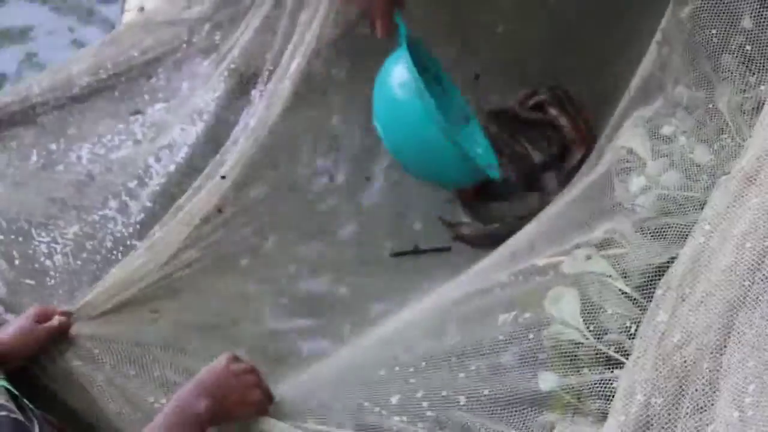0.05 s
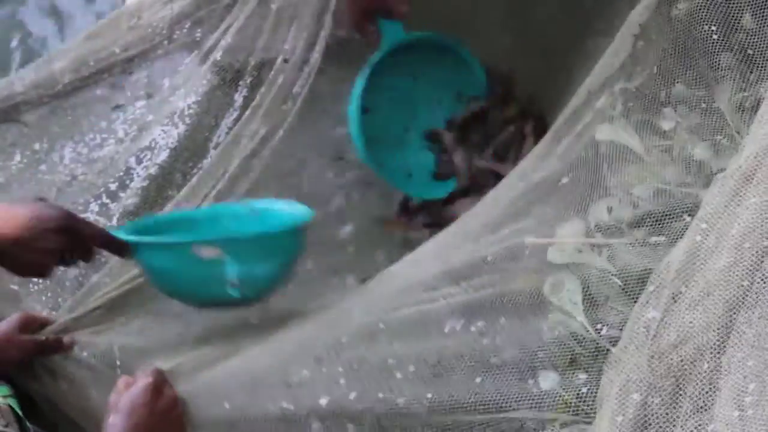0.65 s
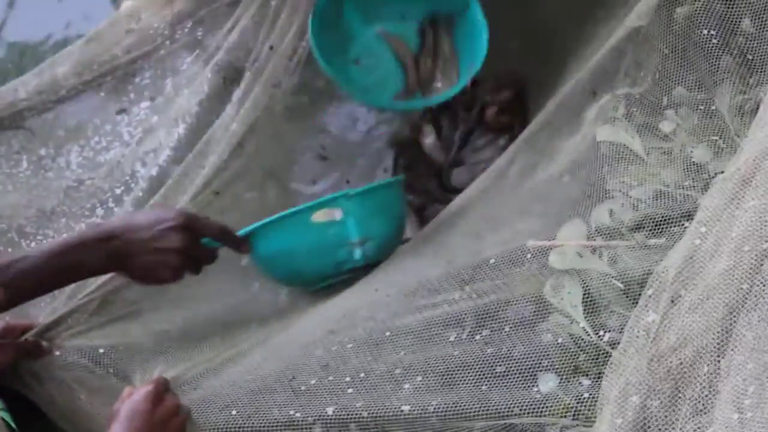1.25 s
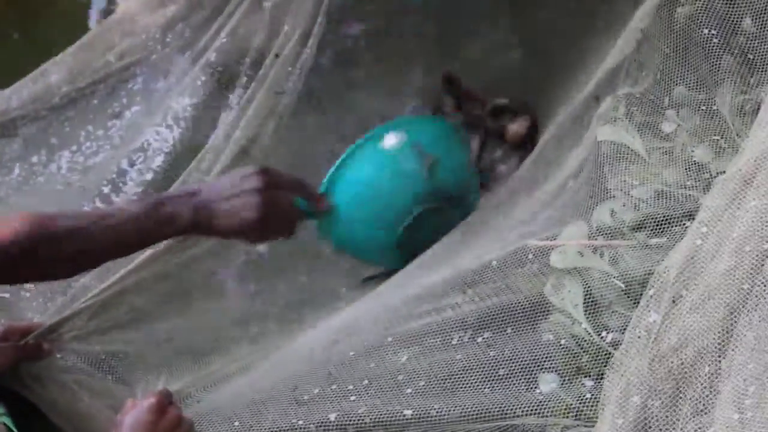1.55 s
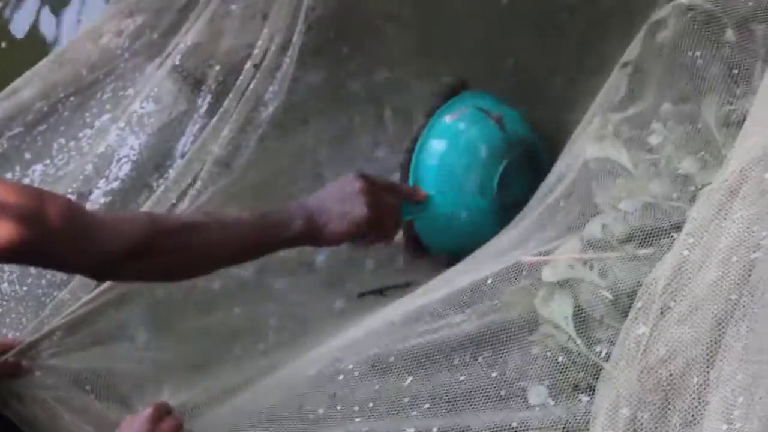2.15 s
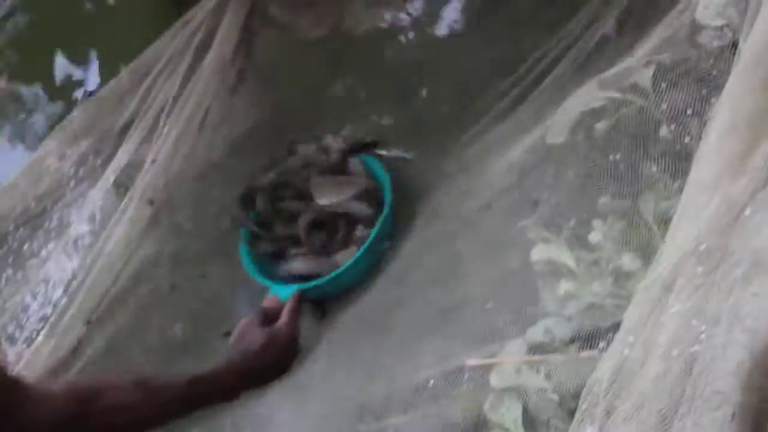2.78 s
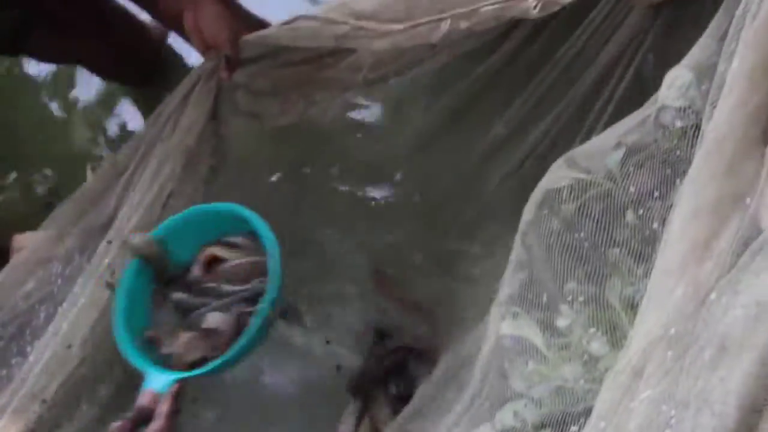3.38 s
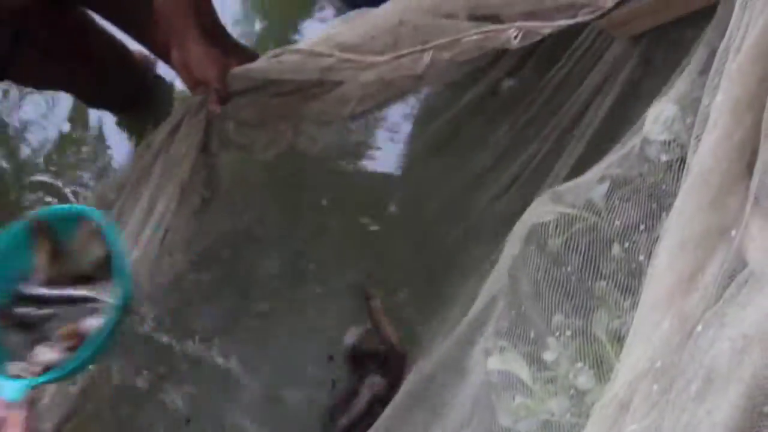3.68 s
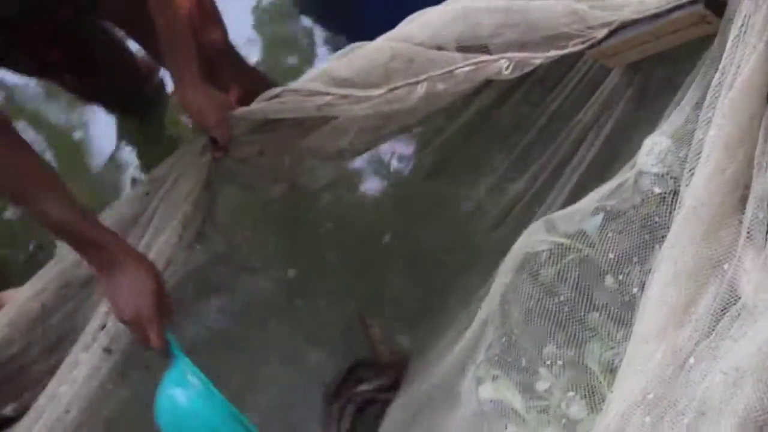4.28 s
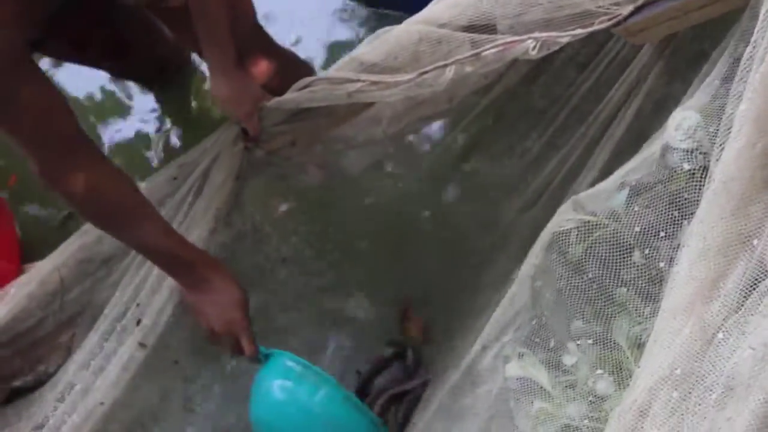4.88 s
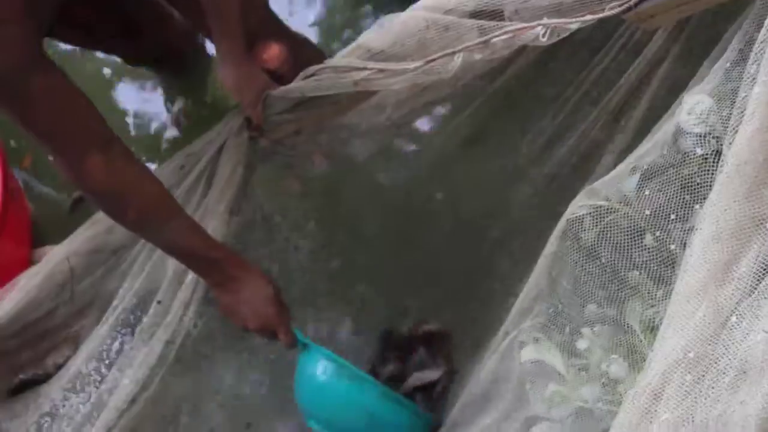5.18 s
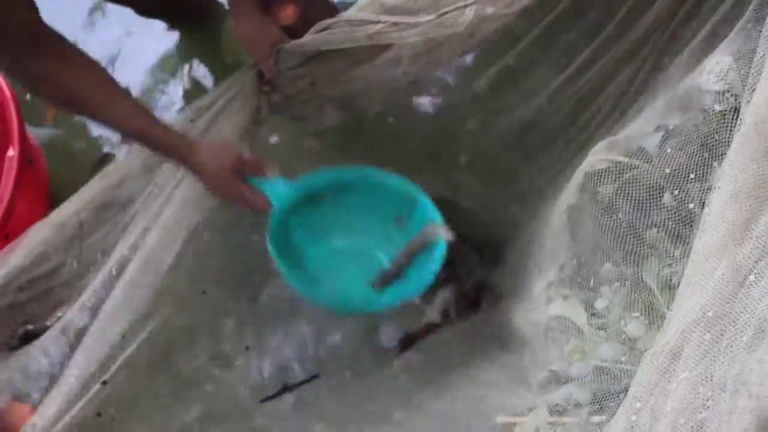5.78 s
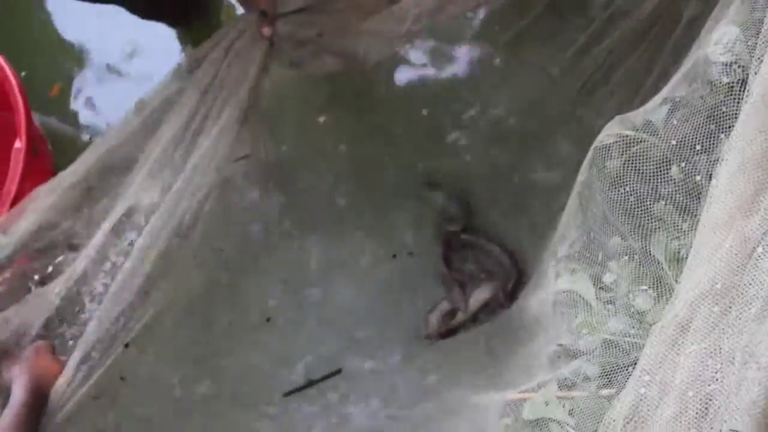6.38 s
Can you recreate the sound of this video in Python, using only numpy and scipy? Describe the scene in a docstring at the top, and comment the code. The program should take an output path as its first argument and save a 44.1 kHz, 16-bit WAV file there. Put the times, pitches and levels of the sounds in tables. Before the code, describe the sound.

At the start, water dumped from a plastic scoop splashes into a pond close to the microphone, thinning into fizzing bubbles and sharp drops by about 1.3 seconds, when a small bird whistles once, faintly. From there to about 4.5 seconds the scoop stirs softly through the water, with small sloshes and scattered ringing drips, busiest around 3 and 4 seconds. A quick cluster of light plastic knocks comes at 2.6 seconds, and a few more between 4.6 and 5.1. One bubble's ring lingers at 4.3. A distant bird gives one long, faint call from about 4.9 to 6.2 seconds. At 5.2 a second, deeper scoopful lands with a plop and a hollow note, then trickles away. After 6 seconds, three thin high whistles sound over a very faint far tone, with knocks at 6.2 and a duller, thudding one at 6.6. Quiet outdoor air hisses throughout.

```python
"""Small fish are scooped out of a net in a pond, close to one microphone outdoors.
First, water dumped from a plastic scoop splashes and fizzes away as countless bubbles ring.
A small bird whistles once; the scoop stirs, drips and takes light knocks, and one bubble's ring lingers.
Then a larger bird calls far off and a second, deeper scoopful falls.
A faint far tone, three thin whistles and a few last knocks end the scene."""
import sys
import numpy as np
from scipy import signal
from scipy.fft import rfft, irfft, next_fast_len
from scipy.io import wavfile
from scipy.ndimage import map_coordinates

SR = 44100
rng = np.random.default_rng(int(sys.argv[2]) if len(sys.argv) > 2 else 0)


def file_out(sig):
    """Save sig as 16-bit WAV at sys.argv[1]."""
    # one column per channel
    cols = np.atleast_2d(sig).T
    # limit, then scale
    lim = np.clip(cols, -1, 1)
    pcm = np.round(lim * 32767).astype(np.int16)
    wavfile.write(sys.argv[1], SR, pcm)


N = 293176
TOP_HZ = 15950  # the highest pitch the microphone keeps


def water():
    """Two scoopfuls fall into the pond and thin to a fizz; between them the scoop stirs."""
    # scoopfuls: start_s, length_s, gulps_db, bubbles_db, fizz_db, spray_db, afterflow_db, fade_db_per_s
    first, second = [(-.17, 1.56, -38, -36.5, -36.5, -38, 8.5, 15.5),
                     (5.199, .95, -39, -40, -41.5, -40.5, -10, 5.5)]
    # tone colours of the first pour, the stirring and the second pour: pitch_hz, level_db
    bright_colour = [(71, -45), (120, -27), (321, -12.5), (348, -18), (393, -13), (493, -9.5), (630, -4.5),
                     (698, -6.5), (949, 0), (1140, -1), (3380, -4.5), (6240, -9.5), (14700, -18),
                     (16000, -10)]
    stir_colour = [(150, -4), (450, -9), (800, 2), (1600, 3.5), (3200, 2), (5500, -4.5), (8500, -7.5),
                   (15000, -20)]
    deep_colour = [(71, -69), (120, -56), (217, -19.5), (393, -11), (436, -5.5), (670, -8), (856, -3.5),
                   (1070, -7.5), (1340, -4.5), (2340, -9.5), (4140, -12), (4780, -19.5), (14700, -36),
                   (16000, -36)]
    out = np.zeros(N)
    add(out, first[0], flow(pour_levels(first), bright_colour, density=1.5, thinning=1.8,
                            spray_cycles=11, spray_scatter_db=6.5, foam=0.94, clump_db=1.87))
    add(out, 0, flow(stroke_levels(), stir_colour, density=.4, thinning=1,
                     spray_cycles=88, spray_scatter_db=5.5, foam=1.0, clump_db=2))
    add(out, second[0], flow(pour_levels(second), deep_colour, density=3.5, thinning=1.4,
                             spray_cycles=5.5, spray_scatter_db=3.5, foam=0.9, clump_db=2))
    return out


def flow(levels_db, colour, density, thinning, spray_cycles, spray_scatter_db, foam, clump_db):
    """Four sizes of bubbles arrive in clumps over a hiss of foam; each size has its own level curve."""
    # ranges of gulps, bubbles, fizz and spray: low_hz, high_hz
    bands = [(150, 650), (650, 1900), (1900, 4500), (4500, 16000)]
    count = len(levels_db[0])
    gulps = cloud(count, 154, 770, 330 * density, cycles=14, scatter_db=1.5, thinning=thinning)
    bubbles = cloud(count, 646, 2240, 700 * density, cycles=27.7, scatter_db=3, thinning=thinning)
    fizz = cloud(count, 1930, 4870, 1000 * density, cycles=36, scatter_db=3.5, thinning=thinning)
    spray = cloud(count, 4330, 16900, 800 * density, spray_cycles, spray_scatter_db, thinning)
    clumps, out = wobble(54.99, count), np.zeros(count)
    for grains, band, db in zip((gulps, bubbles, fizz, spray), bands, levels_db):
        texture = colour_band(grains + foam * rng.standard_normal(count), band, colour)
        out += amp(db) * unit(texture * amp(clump_db * (clumps + wobble(90, count))))
    return out


def pour_levels(pour):
    """Levels in dB: each bubble size plunges in, then flows on more weakly until the scoop is empty."""
    # gulps to spray, larger ones build up longer: build_s, rise_db, fall_db_per_s, afterflow_db
    sizes = [(0.19, 6, 158, -24), (0.12, 2, 42, -16.5), (0.02, 2.5, 32, -12), (0.0056, -5, 39, -16)]
    drained_db_per_s = 78  # how fast the last water breaks off
    _, length, *peaks_db, after_db, fade = pour
    t, levels = clock(int((length + .2) * SR)), []
    for peak_db, (build, rise_db, fall, size_db) in zip(peaks_db, sizes):
        plunge = np.where(t < build, -rise_db * (1 - t / build), -fall * (t - build))
        afterflow = size_db + after_db - fade * t - drained_db_per_s * np.maximum(t - length, 0)
        levels.append(peak_db + 20 * np.log10(np.hypot(amp(plunge), amp(afterflow))))
    return levels


def stroke_levels():
    """Levels in dB: each stroke of the scoop swells and ebbs; deep ones trap larger bubbles."""
    # pushes through the water: middle_s, length_s, level_db, depth_db
    strokes = [(0.495, 0.057, -55.5, 4.9), (0.764, 0.032, -60, 4.5), (1.193, 0.069, -60.5, .4),
               (1.341, 0.036, -58, 4.5), (2.138, .24, -62, 6.5), (2.523, 0.44, -61, .5),
               (2.77, 0.23, -60.5, -0.2), (3.143, 0.21, -59, 0.5), (3.57, 0.8, -60.5, -0.6),
               (3.93, 0.33, -67, -3)]
    # bubble sizes from gulps to spray: level_db, share_of_depth
    sizes = [(-8, 1.62), (-0.85, 0.28), (1.1, -.5), (-5, -1.8)]
    edge_db = 5  # a stroke is this much weaker at its ends
    t = clock(int((strokes[-1][0] + 2 * strokes[-1][1]) * SR))
    power = np.zeros((len(sizes), len(t)))
    for middle, length, db, depth_db in strokes:
        swell_db = db - edge_db * (2 * (t - middle) / length) ** 2
        power += [amp(swell_db + size_db + share * depth_db) ** 2 for size_db, share in sizes]
    return 10 * np.log10(power + 1e-20)


def slaps():
    """A drop hits the surface with a sharp tick inside a brief swell of fine spray."""
    # drops landing: time_s, level_db, pitch_hz
    drops = [(.042, -20.5, 3160), (0.0973, -39, 3600), (.11, -25.5, 4500), (0.258, -26, 3580),
             (0.354, -28, 5960), (.397, -27, 5063), (.527, -32, 3030), (0.599, -30.5, 4560),
             (0.8272, -28, 6550), (0.8808, -37, 3200), (.973, -33.5, 3640), (1.111, -34, 4040),
             (2.3246, -28, 4250), (2.7139, -30.5, 3800), (2.735, -30, 3220), (3.085, -29, 3560),
             (3.194, -30.5, 3370), (3.724, -35, 3370), (3.863, -40, 4300), (3.9225, -30.5, 2980),
             (4.037, -35.5, 3400), (4.135, -41.5, 3900), (4.444, -37, 5100), (4.568, -31, 3220),
             (4.9854, -35, 6500), (5.115, -39.5, 5760), (5.184, -33, 4200), (5.214, -23, 5000),
             (5.764, -38.5, 2970)]
    out, t = np.zeros(N), clock(SR // 16) - .006
    for time, db, hz in drops:
        tick = bubble(np.maximum(t, 0), hz, 6 / hz, rise=0.24, swell=0.63)
        spray = band_noise(len(t), hz * .5, hz * 2.37)
        mist = amp(-22 - 60 * np.maximum(t / 0.087, -t / 0.009))
        burst = amp(-10.5 - 60 * np.maximum(t / 0.0098, -t / 0.0032))
        add(out, time + t[0], amp(db - 1) * (amp(-1) * unit_peak(tick) + spray * (mist + burst)))
    return out


def drips(moving_water):
    """Each drip traps one bubble; large ones in calm water ring longest and splatter least."""
    # the loudest single bubbles: start_s, level_db, pitch_hz
    loud_bubbles = [(.074, -34, 3230), (0.174, -32.5, 2460), (.21, -34.5, 1430), (.481, -39.5, 1660),
                    (.528, -35, 2040), (.723, -41, 2900), (.759, -43, 1630), (0.761, -51, 445),
                    (0.788, -42, 2920), (0.879, -37.5, 2750), (1.0125, -32, 1964), (1.188, -44, 1616),
                    (1.235, -46, 3120), (1.278, -46.5, 3700), (1.402, -49, 2320), (1.746, -51, 1430),
                    (1.841, -52, 816), (1.935, -54, 1570), (1.9819, -43, 2310), (2.0094, -41.5, 2110),
                    (2.2, -45.5, 3470), (2.33, -37, 1565), (2.412, -45.5, 2830), (2.718, -38.5, 1670),
                    (2.761, -40, 1460), (2.763, -41, 929), (2.789, -37, 1495), (2.788, -43, 316),
                    (2.862, -40.5, 1676), (2.958, -45, 1830), (3.082, -43, 2650), (3.122, -43, 2390),
                    (3.166, -39, 1344), (3.1804, -30, 952), (3.1937, -36.5, 2050), (3.212, -41, 1554),
                    (3.481, -48.5, 860), (3.555, -48.5, 521), (3.628, -43.5, 1376), (3.729, -50, 780),
                    (3.806, -43.5, 1230), (3.888, -42.5, 3710), (3.89, -48.5, 716), (3.896, -45, 2980),
                    (3.923, -43.5, 2410), (3.934, -41.5, 3000), (3.976, -47.5, 1840), (4.002, -43.5, 3120),
                    (4.041, -43.5, 1250), (4.091, -46, 1710), (4.244, -50, 1100), (4.29, -39, 1280),
                    (4.427, -43.5, 1462), (4.569, -44, 3520), (4.902, -51, 298), (5.367, -35, 450),
                    (5.754, -48.5, 1290), (5.81, -44, 472), (5.921, -44.5, 2410)]
    # churned water cuts the ring short: water_level_db, ring_time_factor
    damping = [(-72, 1.7), (-58, 1)]
    out, t = np.zeros(N), clock(SR // 8)
    for start, db, hz in loud_bubbles + stray_drips():
        water_now = moving_water[round(start * SR):][:SR // 30]
        water_db = 10 * np.log10(np.mean(water_now ** 2) + 1e-20)
        ring_s = 0.042 * (1000 / hz) ** 0.5 * np.interp(water_db, *np.transpose(damping))
        ring = bubble(t, hz, ring_s, rise=0.091, swell=1.4)
        splatter = band_noise(len(t), hz * .5, hz * 2.4)
        splatter *= amp(-6 - 60 * t / 0.057) * (1 - np.exp(-t / 0.0019))
        add(out, start, amp(db) * (unit_peak(ring) + splatter / (1 + ring_s / 0.1)))
    return out


def stray_drips(first_s=1.3, last_s=4.3, per_s=4):
    """Faint drips fall off the net and hands at random: start_s, level_db, pitch_hz."""
    span = last_s - first_s
    draws = rng.uniform(-0.92, 1, (int(per_s * span), 3))
    return [(first_s + span * abs(when), -55 + 10 * size, 1910 * 2 ** (0.69 * pitch))
            for when, size, pitch in draws]


def sloshes(count=36):
    """A short rush of small bubbles drifts in pitch as the sheet of water thickens or thins."""
    # spills off the rim: start_s, length_s, level_db, first_hz, last_hz
    spills = [(0.165, 0.055, -45, 3480, 1860), (1.313, .046, -55, 800, 1300),
              (1.929, 0.028, -51.5, 1700, 2760), (2.035, .045, -52.5, 595, 514),
              (2.083, 0.04, -49.5, 456, 640), (2.163, .052, -55, 550, 1500),
              (2.191, 0.023, -50, 3140, 3560), (3.074, 0.034, -43, 5270, 1020),
              (3.121, 0.02, -43.5, 2960, 1300), (3.19, 0.03, -44, 1360, 2430),
              (3.625, 0.034, -49.5, 2000, 1100), (3.716, 0.021, -49, 3260, 990),
              (3.858, 0.019, -47.5, 5800, 4730), (3.883, 0.011, -48.5, 4300, 3300),
              (3.92, 0.039, -47.5, 3740, 1720), (4.426, 0.02, -51.5, 2400, 1524),
              (5.18, .02, -47, 2600, 4500)]
    out, t = np.zeros(N), clock(SR // 14)
    for start, length, db, first_hz, last_hz in spills:
        when, size = rng.random((2, count, 1))
        hz = first_hz * (last_hz / first_hz) ** when * np.exp(0.324 * rng.standard_normal(when.shape))
        rings = bubble(np.maximum(t - when * length, 0), hz, 15 / hz, rise=0.69, swell=1.1)
        rush = np.sum(amp(-9 * size) * rings, axis=0)
        strength = np.sqrt(np.sum(rush ** 2) / (length * SR))
        add(out, start, amp(db - 4.5) * rush / strength)
    return out


def knocks():
    """The wet plastic scoop rings briefly when knocked; some knocks are dull, others bright."""
    # knocks on the scoop: start_s, peak_db, brightness_hz
    hits = [(2.57, -35.5, 800), (2.581, -37.5, 1040), (2.591, -31.5, 1315), (4.577, -37, 1860),
            (4.684, -39.5, 1250), (4.911, -36.5, 4100), (4.921, -42, 2960), (5.051, -35, 2920),
            (6.161, -34, 1520), (6.175, -34, 3120), (6.607, -32, 760), (6.612, -29.5, 730),
            (6.626, -35.5, 497)]
    # notes of the scoop and the hand holding it: pitch_hz, level_db, ring_s
    notes = [(211, -6.5, 0.054), (314, 4, 0.035), (430, 5.5, 0.022), (593, 0, 0.044), (792, 3, 0.028),
             (1080, -5.5, 0.093), (1800, 10, 0.032), (2050, 7, 0.0098), (2762, 13.5, 0.017)]
    out, t = np.zeros(N), clock(SR // 8)
    for start, db, bright_hz in hits:
        ring = np.zeros(len(t))
        for hz, note_db, ring_s in notes:
            fade = amp(note_db + rng.normal(0, 0.93) - 60 * t / ring_s)
            ring += fade * np.sin(2 * np.pi * (hz * t + rng.random()))
        crack = rng.standard_normal(len(t)) * amp(18 - 60 * t / 0.028)
        blow = (ring + crack) * (1 - np.exp(-t / 0.001))
        blow = signal.lfilter(*signal.butter(2, 190, "high", fs=SR), blow)
        dulled = signal.lfilter(*signal.butter(2, bright_hz, fs=SR), blow)
        add(out, start, amp(db) * unit_peak(dulled + amp(-32) * blow))
    return out


def thuds():
    """A heavy contact gives a soft thud; an air pocket growing under water sinks in pitch."""
    # thuds and air pockets under the scoop: start_s, peak_db, pitch_hz, ring_s, glide_share
    pushes = [(2.578, -46.5, 160, 0.08, 0.043), (2.584, -51, 75, .12, -0.23),
              (5.194, -29, 1596, 0.06, -0.72), (6.162, -45, 201, 0.046, 0.17),
              (6.608, -34, 220, 0.062, -0.4)]
    out, t = np.zeros(N), clock(SR // 4)
    for start, db, hz, ring_s, glide in pushes:
        thud = bubble(t, hz, ring_s, rise=glide, swell=hz * 0.0034)
        add(out, start, amp(db) * unit_peak(thud))
    return out


def last_stream():
    """The last stream from the scoop sounds a hollow, mostly sinking note."""
    # the note's path: time_s, pitch_hz, level_db
    path = [(5.22, 963, -48), (5.28, 898, -45), (5.45, 945, -51), (5.56, 963, -57.5), (5.68, 803, -63),
            (5.78, 746, -58.5), (5.92, 642, -73)]
    return gliding_tone(path, blur_hz=130.7)


def spurts(count=4, first_s=0.428, every_s=0.164, level_db=-53.5, fall_db_per_s=168):
    """Shaking the scoop sends fine jets through its holes, each spurt a hiss of tiny bubbles."""
    jets = cloud(int(1.3 * SR), 3240, 4110, 2500, cycles=53, scatter_db=3)
    out, t = np.zeros(N), clock(len(jets)) - first_s
    shakes = sum(amp(level_db - fall_db_per_s * np.abs(t - k * every_s)) for k in range(count))
    add(out, 0, jets * shakes)
    return out


def small_bird():
    """Each whistle slides up to its pitch, wavers over a faint hiss and lingers in the trees."""
    # thin whistles: start_s, length_s, pitch_hz, level_db, waver_share
    whistles = [(1.283, 0.1, 6050, -61.5, 0.0355), (6.038, 0.11, 7593, -61, 0.0039),
                (6.236, 0.12, 7490, -59.5, 0.01), (6.423, 0.1, 7460, -58, 0.0073)]
    out, t = np.zeros(N), clock(SR // 4)
    for start, length, hz, db, waver in whistles:
        pitch = hz * (1 - 0.048 * np.exp(-t / 0.0082) + waver * wobble(352, len(t)))
        note = np.sin(2 * np.pi * np.cumsum(pitch) / SR) * amp(2.9 * wobble(66.6, len(t)))
        hiss = band_noise(len(t), hz * 0.81, hz)
        shape = np.interp(t / length, [0, .6, .95, 1.1, 1.6], [0.53, 0.85, 0.66, 0.011, 0.14])
        add(out, start, amp(db) * (note + amp(-8.5) * hiss) * shape)
    trees = rng.standard_normal(len(t)) * amp(-60 * t / 0.49)
    return 0.99 * out + 0.95 * signal.fftconvolve(out, trees / np.linalg.norm(trees))[:N]


def far_bird():
    """A larger bird gives one long call that swells twice."""
    # the call's path: time_s, pitch_hz, level_db
    path = [(4.88, 524, -78), (4.98, 550, -61), (5.17, 565, -58), (5.8, 604, -73), (5.9, 604, -59),
            (6.0, 588, -60.5), (6.13, 578, -60.5), (6.25, 570, -83)]
    return amp(-3) * gliding_tone(path, blur_hz=46.1)


def faint_tone():
    """A bubble's ring lingers and fades; later a faint, thin tone sounds far off."""
    # the path of the ring and the tone: time_s, pitch_hz, level_db
    path = [(4.28, 1320, -57), (4.34, 1310, -60.5), (4.75, 1264, -82), (5.7, 1286, -72),
            (5.95, 1273, -70.5), (6.55, 1343, -76.5)]
    return gliding_tone(path, blur_hz=35.75)


def bank_echo(sound):
    """The pond's banks return a short echo in which low notes last longest."""
    # time the echo takes to fall 60 dB: pitch_hz, fade_s
    fade_times = [(200, 0.24), (1500, 0.14), (10000, 0.14)]
    hz, t, spectrum = signal.stft(rng.standard_normal(SR // 3), SR, nperseg=256)
    fade = amp(-60 * t / along(fade_times, hz)[:, None])
    tail = signal.istft(spectrum * fade, SR, nperseg=256)[1]
    tail *= 1 - np.exp(-clock(len(tail)) / 0.0033)
    return signal.fftconvolve(sound, tail / np.linalg.norm(tail))[:N]


def air():
    """The open air hisses and rumbles quietly."""
    # the air's tone colour: pitch_hz, level_db
    colour = [(15, -18), (25, -14), (50, -10), (80, -10), (134, -8), (250, -14.5), (500, -12.5),
              (1130, -16), (1330, -15), (2200, -16.5), (6900, -22), (10000, -26), (16000, -24)]
    hiss = unit(filtered(rng.standard_normal(N), lambda hz: amp(along(colour, hz))))
    return hiss * amp(-60 + 0.63 * wobble(3.63))


def bubble(t, hz, ring_s, rise, swell):
    """Trapped air rings: it swells quickly, then glides in pitch as it fades 60 dB in ring_s."""
    age = np.minimum(t / ring_s, 1)
    wave = np.sin(2 * np.pi * hz * t * (1 + rise * age / 2))
    return wave * amp(-60 * t / ring_s) * (1 - np.exp(-t * hz / swell))


def cloud(count, low_hz, high_hz, per_s, cycles, scatter_db, thinning=1):
    """Many random bubbles ring together; thinning over 1 makes late ones fewer and louder."""
    draws = rng.random((int(per_s * count / SR), 4))
    order, pitch, life, size = np.hsplit(draws, 4)
    when = order ** thinning
    hz = low_hz * (high_hz / low_hz) ** pitch
    ring_s = cycles / hz * 2 ** (2 * life - 1)
    size_db = scatter_db * np.minimum(-np.log(1 - size), 3)
    gain = amp(size_db) * hz / low_hz * np.sqrt(when / order)
    t = clock(int(np.clip(SR * cycles / low_hz * .7, 16, 1.2e6 / len(draws))))
    rings = gain * bubble(t, hz, ring_s, rise=0.14, swell=0.21)
    places = (when * count).astype(int) + np.arange(len(t))
    return unit(np.bincount(places.ravel(), rings.ravel(), count)[:count])


def gliding_tone(path, blur_hz):
    """A narrow band of noise glides along a path of pitch and level."""
    times, hz, db = np.transpose(path)
    out, t = np.zeros(N), times[0] + clock(int((times[-1] - times[0]) * SR))
    phase = 2 * np.pi * np.cumsum(np.interp(t, times, hz)) / SR
    note = wobble(blur_hz, len(t)) * np.sin(phase) + wobble(blur_hz, len(t)) * np.cos(phase)
    add(out, times[0], amp(np.interp(t, times, db)) * note)
    return out


def colour_band(sound, band, colour):
    """Give a sound the water's tone colour within one range of pitch."""
    low, high = band
    def response(hz):
        edges = (1 + (low / (hz + 1)) ** 10) * (1 + (hz / high) ** 10)
        return amp(along(colour, hz)) / np.sqrt(edges)
    return unit(filtered(sound, response))


def band_noise(count, low_hz, high_hz):
    """A hiss between two pitches."""
    band = signal.butter(2, [low_hz, high_hz], "band", fs=SR)
    return unit(signal.lfilter(*band, rng.standard_normal(count)))


def filtered(x, response):
    """Scale each frequency in x by response(hz)."""
    size = next_fast_len(len(x) + 8192)
    return irfft(rfft(x, size) * response(np.fft.rfftfreq(size, 1 / SR)), size)[:len(x)]


def wobble(per_s, count=N):
    """A smooth curve through per_s random points a second."""
    return map_coordinates(rng.standard_normal(int(count * per_s / SR) + 4), [clock(count) * per_s])


def along(points, hz):
    """Read between (pitch_hz, value) points, with octaves evenly spaced."""
    pitches, values = np.transpose(points)
    return np.interp(np.log(hz + 1), np.log(pitches + 1), values)


def add(track, start_s, sound):
    """Mix a sound in; what comes before time zero is dropped."""
    start = round(start_s * SR)
    sound = sound[max(-start, 0):]
    part = track[max(start, 0):][:len(sound)]
    part += sound[:len(part)]


def amp(db):
    """Decibels to gain."""
    return 10 ** (np.asarray(db) / 20)


def unit(x):
    """Scale to an average level (rms) of 1."""
    return x / np.sqrt(np.mean(x ** 2) + 1e-20)


def unit_peak(x):
    """Scale to a peak of 1."""
    return x / np.abs(x).max()


def clock(count=N):
    """Sample times in seconds."""
    return np.arange(count) / SR


def scene():
    """Everything reaches one microphone, the same on both channels."""
    moving_water = water()
    near = moving_water + spurts() + last_stream() + sloshes()
    near += drips(moving_water) + slaps() + knocks() + thuds()
    background = small_bird() + far_bird() + faint_tone()
    mono = near + amp(-12) * bank_echo(near) + background + air()
    return np.array([mono, mono])


def record(dry):
    """The microphone keeps nothing above TOP_HZ."""
    return np.array([filtered(x, lambda hz: hz < TOP_HZ) for x in dry])


dry = scene()
out = record(dry)
file_out(out)
```